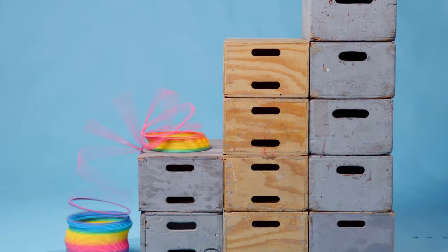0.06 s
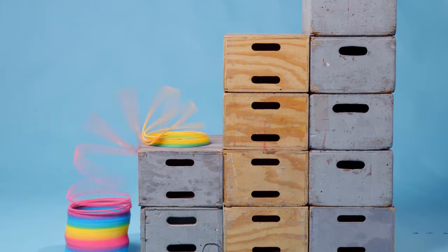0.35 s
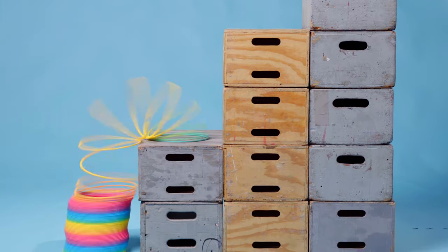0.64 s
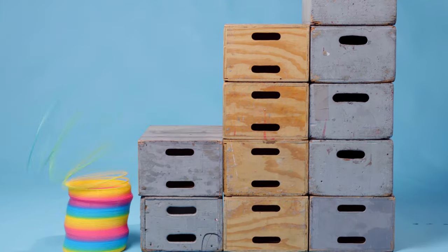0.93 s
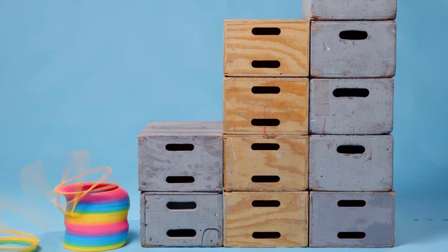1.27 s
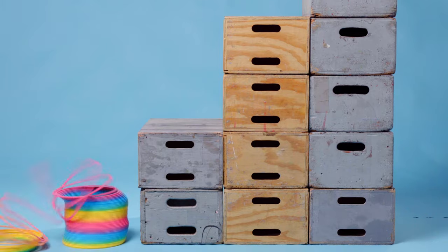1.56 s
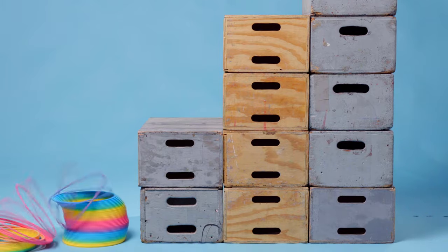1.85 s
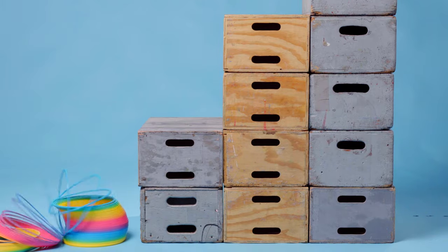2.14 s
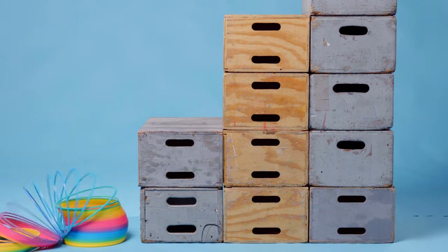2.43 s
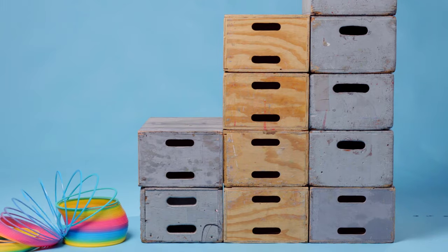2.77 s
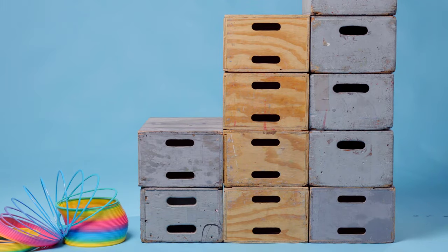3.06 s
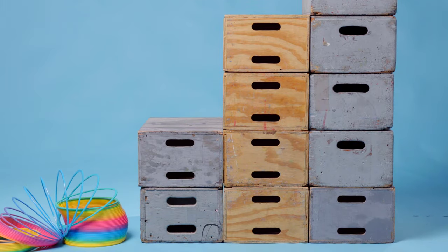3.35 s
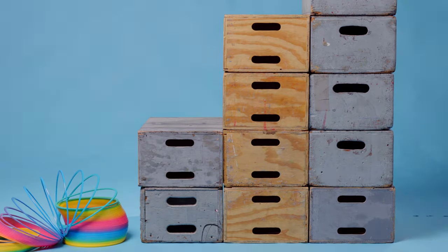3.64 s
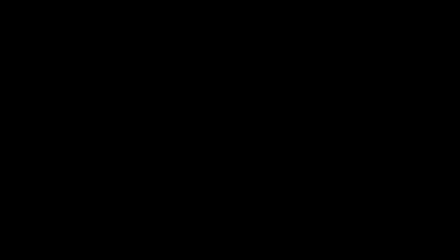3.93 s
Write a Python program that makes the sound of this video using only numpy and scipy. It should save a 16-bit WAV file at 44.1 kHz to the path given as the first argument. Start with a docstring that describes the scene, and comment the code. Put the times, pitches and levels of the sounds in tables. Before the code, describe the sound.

A big plastic coil spring rattles densely and knocks on a hollow wooden crate, then drops to the floor with clacks and small pitched taps. A few clicks and faint ticks end it, close by in a quiet studio.

```python
"""Coil spring walking down wooden crates

A quiet studio, one microphone, a big plastic coil spring close by. Its turns rattle over each other
and knock on a hollow crate; the free end drops to the floor and the last turns peel off with pitched
taps. A short run of clacks and a few faint ticks end it, over the low hum of the building."""
import sys
import numpy as np
from scipy import signal
from scipy.fft import rfft, irfft
from scipy.io import wavfile
from scipy.ndimage import uniform_filter1d

SR = 44100
rng = np.random.default_rng(int(sys.argv[2]) if len(sys.argv) > 2 else 0)


def write(x):
    x = np.atleast_2d(x).T
    wavfile.write(sys.argv[1], SR, np.round(np.clip(x, -1, 1) * 32767).astype(np.int16))


N = 176400
TIME = np.arange(N) / SR

# bright edge and low clatter of plastic on plastic: (frequency [Hz], gain [dB])
TREBLE_SPECTRUM = [(1500,-15), (3500,1.5), (5000,1), (6500,-0.5), (8500,0.5), (11000,-2), (14500,2),
                   (16000,-16.5)]
CLATTER_SPECTRUM = [(80,-6), (140,-2.5), (230,-7), (430,3), (650,-3), (800,-4), (1020,3.5), (1200,1),
                    (1700,4), (2600,-2.5), (5000,-29)]
# how strongly the coil rings on its way down: (time [s], level [dB])
COIL_RING_LEVEL = [(0.0, -43.5), (2.0, -46.5), (2.65, -57)]


def rattle():
    """Hundreds of touches a second between the turns, with lone crisp clicks among them."""
    # the turns part or bunch up for a moment: (time [s], length [s], treble change [dB])
    surges = [(0.114,0.019,-10.5), (0.152,0.027,6.5), (0.381,0.033,9), (0.536,0.004,15), (.61,0.012,-9.5),
              (0.671,0.026,9), (0.812,0.035,-12), (0.876,0.043,-27), (0.952,0.15,5), (1.066,0.014,-16),
              (1.295,0.093,6), (1.408,0.049,5), (2.643,0.16,-27)]
    # course of the treble and of the low clatter: (time [s], level [dB])
    treble_level = [(0.0, -49), (1.96, -50), (2.65, -75)]
    clatter_level = [(0.0, -43.5), (2.05, -57.5), (2.65, -65)]
    # resonances of the coil: (frequency [Hz], gain [dB])
    ring_spectrum = [(1000,-16), (1800,-1.5), (2150,-2), (2380,3.5), (2700,-1), (3100,-2), (3420,3.5),
                     (3900,-0.5), (5000,-8.5), (8000,-20)]
    surge_db = sum(db * np.exp(-(2 * (TIME - at) / length) ** 2) for at, length, db in surges)
    touches = contacts(per_s=1200, spread_db=3.2, decay_s=.0007)
    crisp = from_db(-1) * contacts(per_s=240, spread_db=5, decay_s=.0002)
    treble = colour((touches + crisp) * from_db(level(treble_level) + surge_db - 1.5), TREBLE_SPECTRUM)
    coil = colour(touches * from_db(level(COIL_RING_LEVEL) + .92 * surge_db - 1.5), ring_spectrum)
    clatter = colour(touches * from_db(level(clatter_level) + .63 * surge_db), CLATTER_SPECTRUM)
    return treble + coil + clatter + singing(touches * from_db(surge_db))


def singing(touches):
    """Once the turns hang free in an arch, the touches keep them ringing softly."""
    # modes of the stretched turns: (frequency [Hz], t60 [s], gain [dB])
    modes = [(2386,0.33,-17.5), (3480,0.05,-20.5)]
    start_s, fade_in_s = 1.45, .25
    drive = touches * from_db(level(COIL_RING_LEVEL)) * np.clip((TIME - start_s) / fade_in_s, 0, 1)
    out = 0
    for hz, t60, db in modes:
        unit_power = np.sqrt(4 * np.log(1000) / (t60 * SR))
        out = out + from_db(db) * unit_power * ring(drive, hz, t60)
    return out


def drumming():
    """The turns drum evenly on the hollow crate, whose air hums along."""
    # the crate's low boom: (frequency [Hz], gain [dB])
    drum_spectrum = [(50,-21.5), (160,-15), (205,-5), (260,-1.5), (295,-1), (328,-1.5), (365,-5.5),
                     (500,-18), (2000,-49.5)]
    # course of the drumming: (time [s], level [dB])
    drum_level = [(0,-45), (.25,-40.5), (.43,-38), (.64,-40), (.8,-48.5), (1.02,-49), (1.3,-54.5),
                  (1.5,-60.5), (2.2,-65.5), (2.6,-72)]
    thuds = contacts(per_s=1500, spread_db=1.5, decay_s=.0005)
    air = ring(thuds, hz=326, t60=.2)
    body = rms_one(colour(thuds, drum_spectrum)) + from_db(-8) * rms_one(air)
    running_rms = np.sqrt(uniform_filter1d(body ** 2, size=SR // 20) + 1e-9)
    return body / running_rms * from_db(level(drum_level))


def knocks():
    """Turns slap the crate's edge: a plastic smack, a woody thud and the ring of the box."""
    # blows on the edge: (time [s], wood level [dB], plastic level [dB], plastic decay [s])
    blows = [(.003,-37.5,-28.5,0.0068), (0.015,-38,-27,0.0031), (0.0633,-42.5,-25.5,0.0043),
             (.099,-26.5,-33,0.0045), (.165,-37.5,-28,0.0074), (.2345,-23.5,-21.5,0.0055),
             (.244,-29.5,-39.5,.005), (.298,-35,-30,0.0047), (.398,-41,-36,0.012), (.425,-43.5,-32,0.0041),
             (.444,-33,-30,0.0067), (0.458,-42,-32,0.0052), (.472,-37.5,-34,0.01), (0.484,-42,-44.5,0.0038),
             (.543,-40,-35.5,0.013), (0.5913,-35,-30,0.0044), (0.6281,-38.5,-26,0.0035),
             (.669,-40.5,-37.5,0.0085), (.685,-37,-40.5,0.02), (.760,-37,-36,0.0063),
             (0.798,-36.5,-35,0.0023), (0.83,-39.5,-41,0.018)]
    # tone of each material: (frequency [Hz], gain [dB])
    plastic_spectrum = [(600,-27.5), (1300,-6), (1600,-4), (2200,0.5), (2700,-2), (3400,-0.5), (4300,-8),
                        (6000,-21), (12000,-25)]
    wood_spectrum = [(120,-15.5), (300,-7.5), (500,1), (680,-2.5), (800,4.5), (1000,-4), (1400,-12),
                     (3000,-32.5)]
    t = TIME[:SR // 8]
    smack, thud = np.zeros((2, N))
    for at, wood_db, plastic_db, decay in blows:
        start = int(at * SR)
        for layer, db, decay_s in ((smack, plastic_db, decay), (thud, wood_db, 1.4 * decay)):
            shape = envelope(t, rise_s=.3 * decay_s, decay_s=decay_s)
            layer[start:start + len(t)] += from_db(db) * shape * rng.choice([-1, 1], len(t))
    times, wood_db, plastic_db, _ = np.transpose(blows)
    strength_db = (wood_db + plastic_db) / 2
    box_db = -42 + .61 * (strength_db - strength_db.mean())  # only part of the extra force reaches it
    box = crate(clicks(times + .003, box_db))
    plastic = from_db(-.5) * colour(smack, plastic_spectrum)
    wood = from_db(-2.5) * colour(thud, wood_spectrum)
    return plastic + wood + box


def crate(hits):
    """The hollow box rings; every hit strikes each mode with a strength of its own."""
    # modes of the crate: (frequency [Hz], gain [dB], t60 [s])
    modes = [(500,-5,.09), (680,-10,.1), (783,4,0.13), (810,-1,.1), (902,-6.5,.1), (974,-2,.13),
             (1025,-2,.1), (1224,-6,.13), (1581,0,0.12), (1922,-6,0.13), (2712,-9.5,0.092)]
    uneven = from_db(rng.normal(0, 2, (len(modes), N)))
    return sum((-1) ** k * ring(hits * uneven[k] * from_db(db), hz, t60)
               for k, (hz, db, t60) in enumerate(modes))


def hollow_notes():
    """A square hit brings out one note of the crate, which swells quickly and rings out."""
    # square hits: (time [s], frequency [Hz], level [dB])
    square_hits = [(.1,1025,-27.5), (.236,1015,-26), (.168,1581,-32), (.5913,1581,-28.5), (0.81,1581,-32)]
    out = 0
    for at, hz, db in square_hits:
        swell = 1 - np.exp(-np.maximum(TIME - at, 0) / .002)
        out = out + swell * ring(clicks(np.array([at]), db), hz, t60=.12)
    return out


def clacks():
    """Hard blows of turn on turn: a low body, a ring and a bright crack."""
    # turns colliding: (time [s], body level [dB], ring level [dB], crack level [dB])
    collisions = [(0.196,-47,-43.5,-38.5), (.298,-29.5,-33.5,-29.5), (0.918,-44.5,-47,-38.5),
                  (0.998,-48,-37,-36.5), (1.0831,-42.5,-34.5,-41), (1.119,-39.5,-43.5,-40),
                  (1.125,-33,-32,-40.5), (1.159,-45,-37,-43), (1.178,-33,-40.5,-44.5),
                  (1.216,-47.5,-39,-51.5), (1.23,-46.5,-40.5,-48.5), (1.282,-34,-35.5,-35),
                  (1.307,-44.5,-38,-36), (1.3405,-45.5,-40.5,-37)]
    # ring of the struck turns: (frequency [Hz], gain [dB])
    ring_spectrum = [(700,-23), (1500,-19.5), (2200,7), (2800,2), (3500,7), (4300,2), (5500,-12.5),
                     (9000,-23), (15000,-33.5)]
    times, body_db, ring_db, crack_db = np.transpose(collisions)
    body = chatter(clicks(times, body_db + 1.5), rise_s=.00021, decay_s=.003)
    coil = chatter(clicks(times, ring_db + 3), rise_s=.00097, decay_s=.0058)
    crack = chatter(clicks(times, crack_db + 5), rise_s=.00051, decay_s=.0022)
    return colour(body, CLATTER_SPECTRUM) + colour(coil, ring_spectrum) + colour(crack, TREBLE_SPECTRUM)


def snaps():
    """An edge slips with a thin, bright crack and a trace of buzz."""
    # slipping edges: (time [s], level [dB])
    slips = [(0.0871,-21), (0.137,-28.5), (0.2084,-24), (0.227,-23.5), (0.26,-17), (0.2983,-17.5),
             (0.3307,-21.5), (0.4258,-21), (0.464,-22.5), (0.537,-18.5), (0.947,-20.5), (1.171,-24.5),
             (1.260,-11.5), (1.3419,-19), (1.436,-22), (2.047,-23), (2.053,-23), (2.461,-37.5), (2.514,-45),
             (2.525,-37), (2.536,-42)]
    hits = clicks(*np.transpose(slips))
    buzz = chatter(hits, rise_s=.0001, decay_s=.0005)
    return colour(from_db(1.5) * hits + from_db(-12.5) * buzz, TREBLE_SPECTRUM)


def taps():
    """Each turn landing on the pile on the floor pips in two modes, sliding up to a pitch of its own."""
    # landings: (time [s], low mode level [dB], high mode level [dB], crack level [dB])
    landings = [(1.393,-40.5,-41,-45), (1.443,-33.5,-34,-40.5), (1.493,-38.5,-41,-41.5),
                (1.538,-37,-38,-44.5), (1.588,-34.5,-32.5,-38), (1.61,-43,-40,-46), (1.643,-36.5,-35.5,-49),
                (1.699,-39,-37.5,-57), (1.75,-35.5,-35.5,-41), (1.769,-39,-50,-48), (1.812,-37,-37,-44),
                (1.861,-42,-43,-41), (1.917,-39,-42,-40.5), (1.967,-43.5,-42,-37.5),
                (2.025,-67,-33.5,-42.5), (2.093,-50,-36,-42.5), (2.163,-49,-44,-43), (2.203,-47,-40,-45.5),
                (2.220,-46,-35,-43), (2.259,-50.5,-46,-53), (2.295,-53,-44,-53)]
    # the two modes of a turn: (frequency [Hz], gain [dB])
    modes = [(2353,7.5), (3395,1.5)]
    rise_s, hold_s, t60_s, high_delay_s = .00094, .0036, .01, .001
    flat_share, slide_s = .38, .00048
    times, low_db, high_db, crack_db = np.transpose(landings)
    crack = chatter(clicks(times, crack_db + 3), rise_s=.0001, decay_s=.0076)
    body = chatter(clicks(times, low_db - 9), rise_s=.00032, decay_s=.0037)
    out = colour(crack, TREBLE_SPECTRUM) + colour(body, CLATTER_SPECTRUM)
    t = TIME[:SR // 10]
    shape = (1 - np.exp(-t / rise_s)) * from_db(-60 * np.maximum(t - hold_s, 0) / t60_s)
    bent_time = np.cumsum(1 - flat_share * np.exp(-t / slide_s)) / SR
    for (hz, mode_db), levels, delay in zip(modes, (low_db, high_db), (0, high_delay_s)):
        starts = ((times + delay) * SR).astype(int)
        for start, db, detune in zip(starts, levels, rng.normal(0, .01, len(times))):
            pip = shape * np.sin(2 * np.pi * hz * (1 + detune) * bent_time)
            out[start:start + len(t)] += from_db(db + mode_db) * pip
    return out


def settling():
    """The arch gives way in crisp clacks and a light rustle, then the coil sways to rest."""
    # the last turns flick over: (time [s], level [dB], decay [s], ring frequency [Hz])
    flicks = [(2.3344,-39.5,0.0033,3330), (2.426,-43.5,0.0025,3490), (2.6693,-36.5,0.0014,3650),
              (2.695,-38,0.0022,3480), (2.719,-45,0.0031,6060), (2.7384,-36,0.0014,5000),
              (2.752,-40,0.0041,3390)]
    # rustle of the arch, and soft ticks of the swaying coil: (time [s], level [dB])
    rustle_level = [(2.663,-52.5), (2.77,-57), (2.80,-77), (2.86,-86)]
    sway_ticks = [(2.585,-55), (2.826,-51), (2.943,-67.5), (3.045,-61), (3.139,-70), (3.248,-64.5),
                  (3.367,-71), (3.497,-61), (3.617,-72.5)]
    # tone of the flicks and of the ticks: (frequency [Hz], gain [dB])
    flick_spectrum = [(300,-13), (1200,-8.5), (3600,1), (5000,-2.5), (8000,-5), (15000,-9)]
    tick_spectrum = [(1200,-7), (2200,-0.5), (3600,0.5), (4600,-3), (6000,-10), (15000,-24)]
    t = TIME[:SR // 10]
    crack, pings = np.zeros((2, N))
    for at, db, decay, hz in flicks:
        start = int(at * SR)
        shape = from_db(db) * envelope(t, rise_s=.66 * decay, decay_s=decay)
        crack[start:start + len(t)] += shape * rng.choice([-1, 1], len(t))
        pings[start:start + len(t)] += shape * np.sin(2 * np.pi * hz * t)
    rustle_gain = from_db(level(rustle_level)) * (TIME > rustle_level[0][0])
    rustle = rustle_gain * contacts(per_s=1500, spread_db=2.5, decay_s=.0007)
    ticks = chatter(clicks(*np.transpose(sway_ticks)), rise_s=.0012, decay_s=.003)
    return colour(crack + rustle, flick_spectrum) + from_db(-5.5) * pings + colour(ticks, tick_spectrum)


def room(x, spots=6, spot_s=.03, t60_s=.28, wall_hz=5950):
    """A short tail, dulled by the walls; the contacts wander over spots with their own reflections."""
    t = TIME[:SR // 2]
    tails = rng.standard_normal((spots, len(t))) * from_db(-60 * t / t60_s) * (t > .005)
    tails /= np.linalg.norm(tails, axis=1, keepdims=True)
    wet = 0
    for k, tail in enumerate(tails):
        steps_past = (TIME / spot_s - k) % spots
        crossfade = np.sin(np.pi / 2 * np.minimum(steps_past, 2))
        wet = wet + signal.fftconvolve(x * crossfade, tail)[:N]
    return from_db(-4) * signal.sosfilt(signal.butter(1, wall_hz, fs=SR, output="sos"), wet)


def room_tone(hum_hz=57.6):
    """Low hum and rumble of the building."""
    # rumble in the studio: (frequency [Hz], gain [dB])
    rumble_spectrum = [(20,-10.5), (40,-6), (48,-6.5), (58,1), (68,-3.5), (100,-3), (150,-17), (250,-21.5),
                       (600,-30.5), (1500,-40.5), (4000,-47), (8000,-52), (14500,-50.5), (16000,-58)]
    rumble = from_db(-62) * rms_one(colour(rng.standard_normal(N), rumble_spectrum))
    return rumble + from_db(-53.5) * np.sin(2 * np.pi * hum_hz * TIME)


def contacts(per_s, spread_db, decay_s):
    """Random touches of uneven strength; rms 1."""
    sizes = from_db(spread_db * np.minimum(rng.exponential(1, N), 3.6))
    hits = sizes * (rng.random(N) < per_s / SR)
    return rms_one(chatter(hits, rise_s=.00005, decay_s=decay_s))


def chatter(hits, rise_s, decay_s):
    """Each hit breaks up into a quickly dying buzz of tiny contacts."""
    shape = envelope(TIME[:SR // 4], rise_s, decay_s)
    power = signal.fftconvolve(hits ** 2, shape ** 2)[:N]
    return np.sqrt(np.maximum(power, 0)) * rng.choice([-1, 1], N)


def clicks(times, levels_db):
    """One click for each event."""
    out = np.zeros(N)
    out[np.clip(times * SR, 0, N - 1).astype(int)] = from_db(levels_db)
    return out


def envelope(t, rise_s, decay_s):
    """Exponential rise and decay of a blow; peak 1."""
    shape = (1 - np.exp(-t / rise_s)) * np.exp(-t / decay_s)
    return shape / shape.max()


def ring(x, hz, t60):
    """A unit click sets a sine of height 1 ringing."""
    radius, angle = from_db(-60 / (t60 * SR)), 2 * np.pi * hz / SR
    return signal.lfilter([0, np.sin(angle)], [1, -2 * radius * np.cos(angle), radius ** 2], x + 1e-18)


def colour(x, points, size=8192):
    """Causal filter with the given spectrum; white noise keeps its power."""
    hz, db = np.transpose(points)
    bin_hz = np.fft.rfftfreq(size, 1 / SR) + 1
    gain = rms_one(from_db(np.interp(np.log(bin_hz), np.log(hz), db)))
    cepstrum = irfft(np.log(gain))
    cepstrum[1:size // 2] *= 2  # fold to minimum phase
    cepstrum[size // 2 + 1:] = 0
    return signal.fftconvolve(x, irfft(np.exp(rfft(cepstrum))))[:N]


def level(points, fall_db_per_s=152):
    """A level curve in dB that dies away after its last point."""
    times, db = np.transpose(points)
    return np.interp(TIME, times, db) - fall_db_per_s * np.maximum(TIME - times[-1], 0)


def from_db(db):
    """Decibels to gain."""
    return 10 ** (np.asarray(db) / 20)


def rms_one(x):
    """Scale to rms 1."""
    return x / np.sqrt(np.mean(x ** 2) + 1e-20)


def scene():
    """The coil in the studio; the taps on the floor reach the microphone with less of the room."""
    coil = rattle() + drumming() + knocks() + hollow_notes() + clacks() + snaps() + settling()
    landing = taps()
    return (coil + landing + room(coil + .62 * landing) + room_tone())[None]


def record(dry):
    """The microphone's mono signal, with the top cut steeply."""
    cutoff_hz = 16200
    return signal.sosfilt(signal.ellip(10, .2, 70, cutoff_hz, fs=SR, output="sos"), dry)


dry = scene()
out = record(dry)
write(out)
```